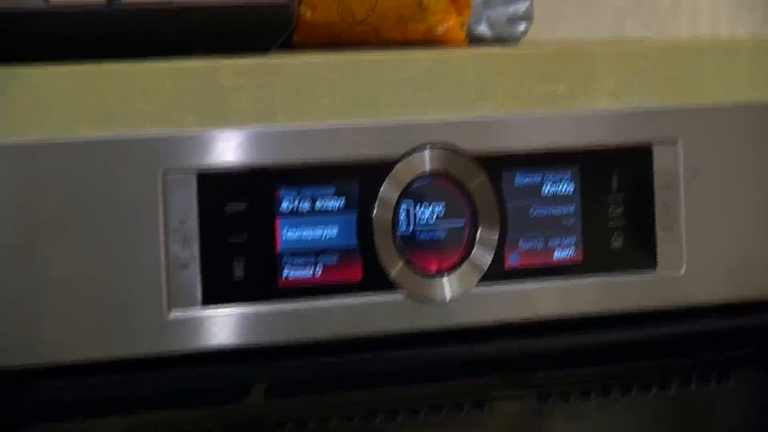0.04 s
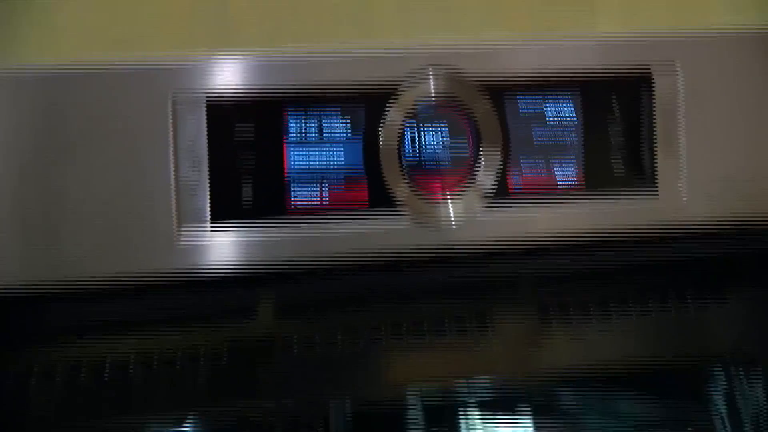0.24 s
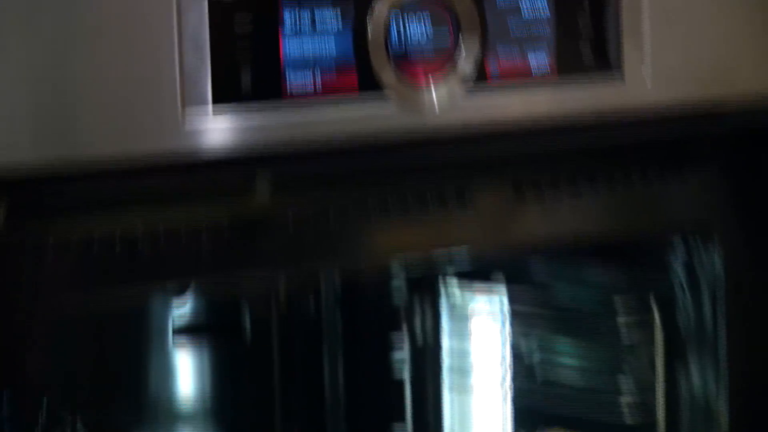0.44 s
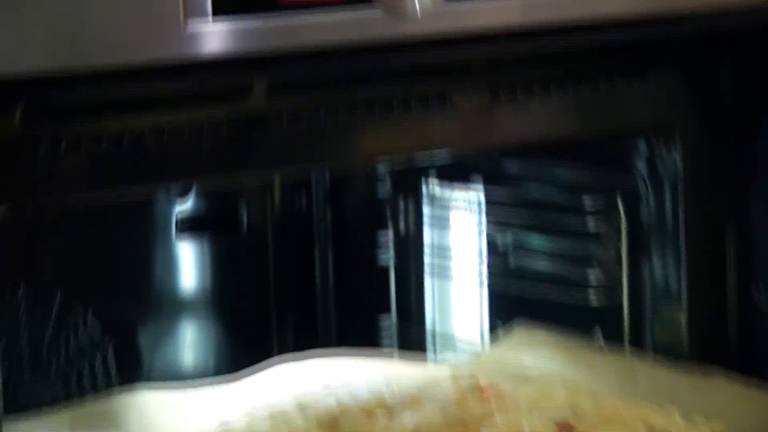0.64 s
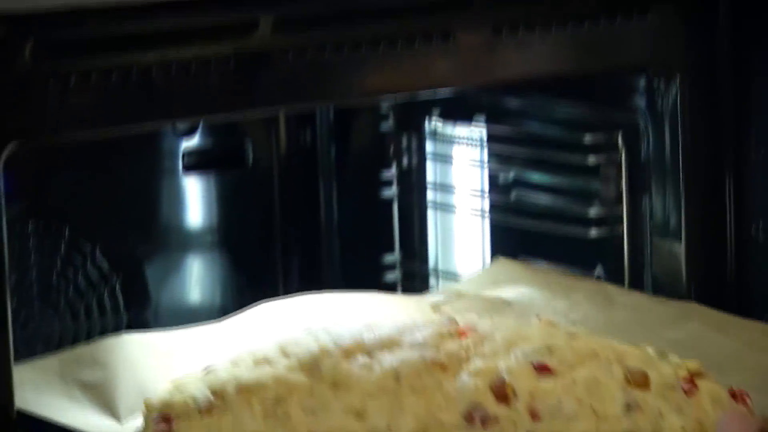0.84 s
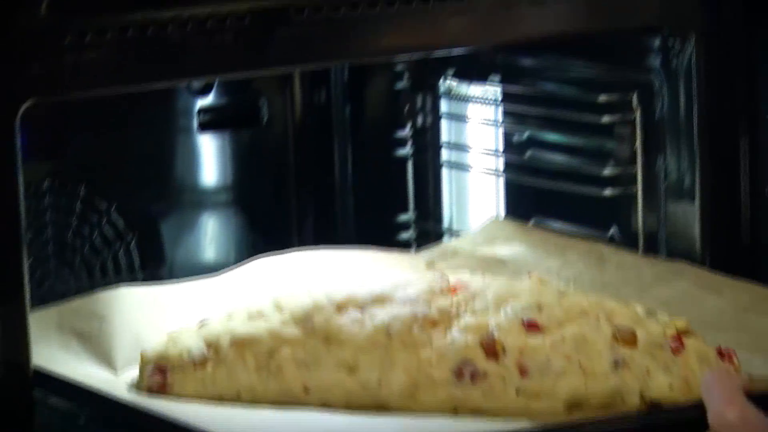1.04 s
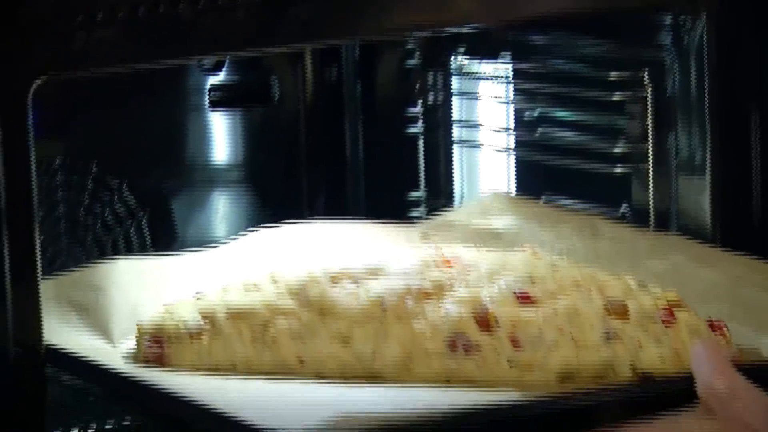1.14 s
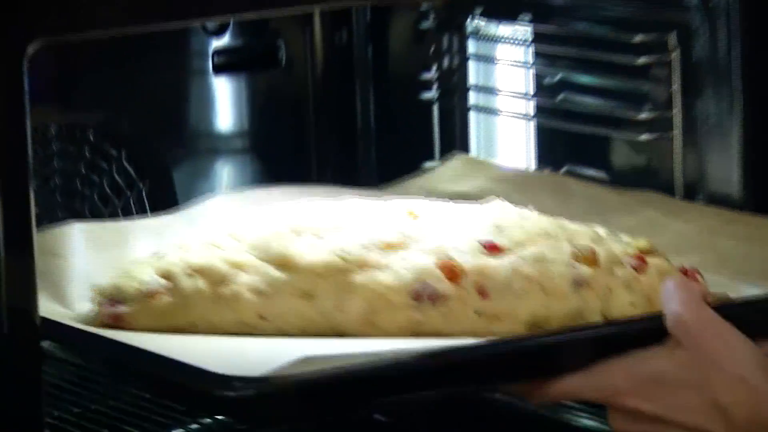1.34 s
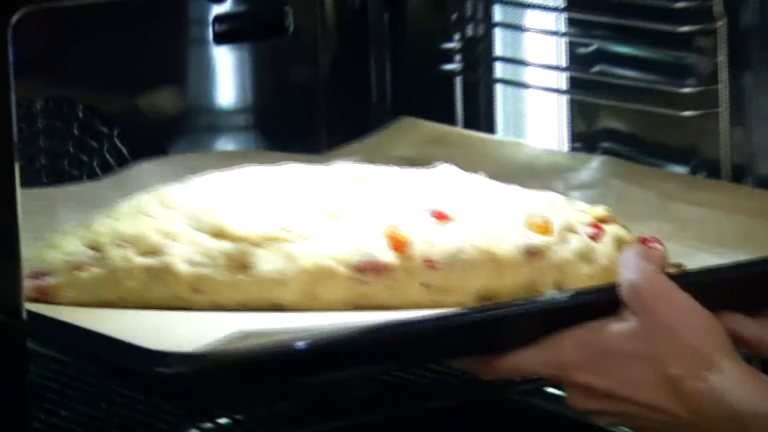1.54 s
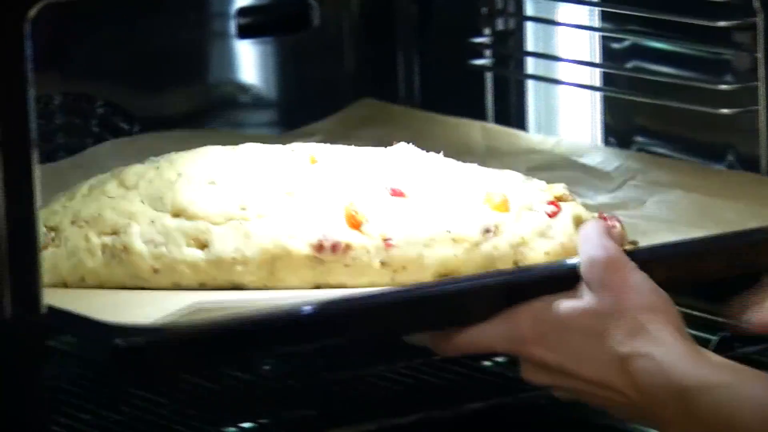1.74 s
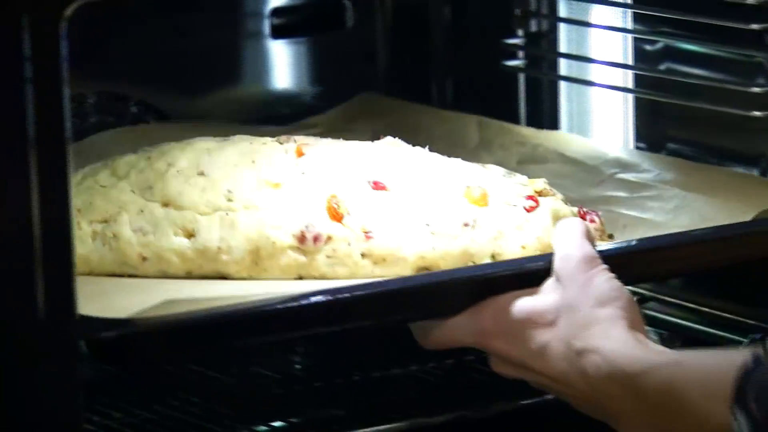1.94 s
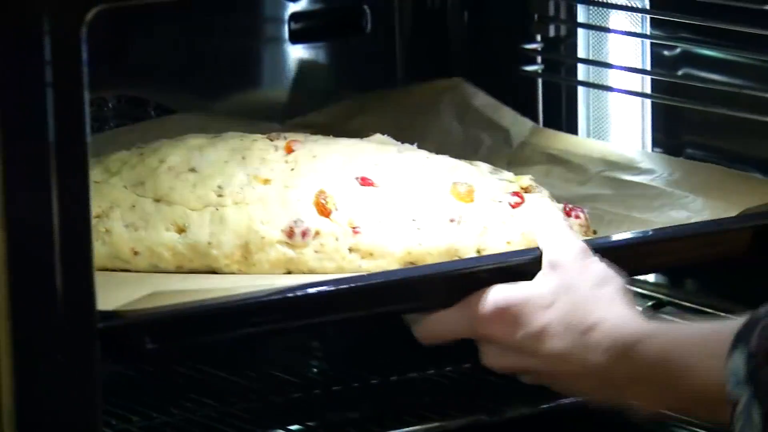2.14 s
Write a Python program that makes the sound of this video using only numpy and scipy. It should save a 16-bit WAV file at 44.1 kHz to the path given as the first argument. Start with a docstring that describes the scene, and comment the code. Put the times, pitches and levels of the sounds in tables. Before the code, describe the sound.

A metal baking tray clatters and scrapes along a wire oven rack.

```python
"""A kitchen, close to the oven, as a metal baking tray goes in.
After a soft swish the open door bumps twice against its stop and its panels ring. The tray clatters
onto the wire rack, scrapes along it in tiny stick-slip jolts, squeaks where its rim catches and rattles
home; a second swish follows. The oven fan hums throughout and the kitchen rings after each blow."""
import sys
import numpy as np
from scipy import signal
from scipy.fft import rfft, irfft, next_fast_len
from scipy.io import wavfile
from scipy.ndimage import map_coordinates

SR = 44100
rng = np.random.default_rng(int(sys.argv[2]) if len(sys.argv) > 2 else 0)


def unload_wav(signal):
    """Save mono or channel-first audio to the path in sys.argv[1] as 16-bit WAV at rate SR, clipped to [-1, 1]."""
    wavfile.write(
        sys.argv[1],
        SR,
        np.round(np.clip(np.atleast_2d(signal).T, -1, 1) * 32767).astype(np.int16),
    )


N = 96843
T = np.arange(N) / SR

# the kitchen's reverb tail: freq_hz, t60_s
KITCHEN_DECAY = [(80, 0.85), (210, 1), (560, 0.91), (1500, 0.61), (3900, 0.37), (10000, 0.3)]
# the short clatter of metal inside the oven: freq_hz, t60_s
CLATTER_DECAY = [(100, 0.48), (600, 0.18), (2500, 0.088), (10000, 0.05)]
# attack of a ring, slowest in the lows: freq_hz, rise_s
BLOOM = [(120, 0.015), (500, 0.0035), (1200, 0.00067), (4000, 0.00033)]


def tray_knocks():
    """The tray's rim strikes the rack wires; each hit clatters and sets the tray ringing."""
    # hits on the rack: start_s, level_db, thud_db, bright_db, snap_db
    hits = [(0.9040, -14, -9.5, -10, -2), (0.9102, -21.5, 0, -1, 4), (0.9300, -14.5, 2, 3.5, 6.5),
            (0.9775, -21.5, 4.5, 1, 9.5), (0.9914, -23.5, -8, -8.5, 8.5), (1.0367, -32, 1.5, -2, 13),
            (1.3106, -19.5, -13, 4, 1), (1.4097, -24.5, -11, -11, 4), (1.4865, -21, -9, 3, -2.5),
            (1.5737, -25, -10, 6, 3.5), (1.6616, -14.5, -4, 2, 5.5), (1.7720, -12.5, 9, 2.5, 2.5),
            (1.7795, -24, 9.5, -7, 18), (1.8172, -10.5, 10, 10, 7), (1.8543, -13.5, 6, 6.5, 11.5),
            (1.8590, -16.5, 8, 6, 7), (1.8910, -13.5, 3, 2.5, 3), (1.9220, -16.5, -4, 3.5, -2),
            (1.9562, -16, 3, 0.5, -10), (1.9678, -21, -17, -1.5, 2), (2.0595, -19.5, -3.5, -0.5, -2)]
    # EQ of a tray hit: freq_hz, gain_db
    colour = [(24, -49), (40, -42), (139, -1.5), (235, -16), (427, -9.5), (577, -7.5), (653, -0.5),
              (740, -10), (1640, -15), (2220, -7), (3300, -11.5), (7910, -17), (15500, -38)]
    out = np.zeros(N)
    for start_s, level_db, thud_db, bright_db, snap_db in hits:
        hit = blow(colour, CLATTER_DECAY, thud_db, bright_db, snap_db,
                   snap_s=0.0044, snap_hz=1050, room_db=-10.5)
        add(out, start_s, amp(level_db) * (hit + amp(-3.5) * tray_ring()))
    return out


def tray_ring():
    """The loaded tray rings in its modes, the highest dying first."""
    # the tray's resonances: pitch_hz, level_db
    resonances = [(133, -3), (156, 0.5), (189, -4.5), (270, -6), (381, -4), (440, -1), (558, -2), (658, 2),
                  (835, -4), (1180, -2.5), (1410, -2.5), (2217, -7), (2268, -0.5), (5399, -14), (7000, 0)]
    # their ring time: freq_hz, t60_s
    decay = [(120, 0.18), (270, 0.42), (600, 0.12), (2300, 0.21), (7000, 0.047)]
    hz, db = np.transpose(resonances)
    return struck_modes(hz, db, curve_at(decay, hz))


def tray_slide():
    """Fine slips hiss along the rim, coarser jolts shake the rack, and both ring the tray."""
    # friction envelope: time_s, level_db
    friction_levels = [(1.0, -35), (1.1, -41), (1.2, -40.5), (1.309, -32), (1.311, -30), (1.38, -27.5),
                       (1.44, -21.5), (1.47, -30), (1.56, -29), (1.645, -23), (1.70, -28), (1.76, -30.5),
                       (1.83, -25), (1.88, -23.5), (1.97, -28.5), (2.04, -35.5), (2.19, -41)]
    # EQ of the scrape: freq_hz, gain_db
    rasp_colour = [(200, -19), (410, -2), (700, -7), (1150, -0.5), (1600, -5), (2180, -1), (3720, -7.5),
                   (6770, -7), (10000, -15), (15800, -22)]
    # high-shelf ride on the scrape: time_s, gain_db
    treble_levels = [(1.0, -10), (1.2, -3), (1.305, -4), (1.315, 7.5), (1.38, 2.5), (1.43, -1.5),
                     (1.6, 1.5), (1.7, -1), (1.8, 1), (2.19, -19)]
    # envelope of the loaded tray shuddering on the wires: time_s, level_db
    shudder_levels = [(1.0, -33), (1.15, -49), (1.32, -38), (1.375, -25.5), (1.43, -39), (1.54, -35.5),
                      (1.64, -29), (1.70, -28), (1.77, -22.5), (1.85, -20), (1.97, -25), (2.05, -28.5),
                      (2.19, -52)]
    # EQ of the shudder: freq_hz, gain_db
    shudder_colour = [(25, -39), (50, -26), (80, -18), (110, -4.5), (135, 3), (165, -9.5), (210, -11.5),
                      (270, -5.5), (320, -13.5), (440, -7.5), (640, -4.5), (1200, -19.5), (2000, -26),
                      (4000, -76)]
    friction = slips(per_s=2500) * envelope(friction_levels) * amp(2.92 * wobble(70))
    rasp = equalise(friction, rasp_colour)
    treble = signal.sosfiltfilt(highpass(hz=7040), rasp)
    rasp = rasp + treble * (envelope(treble_levels) - 1)
    jolts = slips(per_s=600) * envelope(shudder_levels) * amp(2.2 * wobble(39.85))
    shudder = equalise(jolts, shudder_colour)
    ring = resonate(amp(-8.5) * friction + amp(-9.5) * jolts, tray_ring())
    cavity = resonate(rasp, noise_tail(CLATTER_DECAY))
    room = resonate(rasp + shudder, noise_tail(KITCHEN_DECAY))
    return amp(-2.5) * rasp + amp(-1.5) * cavity + amp(-3) * shudder + ring + amp(-10) * room


def slips(per_s, spread_db=2.5):
    """Stick-slip: a random train of tiny jolts of uneven size."""
    slipping = rng.random(N) < per_s / SR
    size = amp(spread_db * rng.standard_normal(N))
    direction = np.sign(rng.standard_normal(N))
    return unit_rms(slipping * direction * size)


def tray_groans():
    """The tray's bottom groans as stick-slip briefly locks onto one low mode."""
    # swells of the groan: peak_s, level_db, half_length_s
    groans = [(1.395, -25.5, 0.04), (1.60, -28.5, .035)]
    pitch_hz = 269
    swell = sum(amp(db) * np.exp(-((T - peak_s) / half_s) ** 2) for peak_s, db, half_s in groans)
    return swell * np.sin(2 * np.pi * pitch_hz * T + 0.18 * wobble(49.8))


def rim_squeaks():
    """The rim catches on a wire and gives a short squeak of wavering pitch."""
    # catches: start_s, pitch_hz, level_db, length_s
    squeaks = [(1.312, 478.7, -23.5, 0.029), (1.436, 601, -27, 0.043)]
    # a squeak's overtones: harmonic_number, level_db
    partials = [(2, 0), (3, -1), (4, 0), (5, -21)]
    out, t = np.zeros(N), T[:SR]
    for start_s, pitch_hz, level_db, length_s in squeaks:
        cycles = np.cumsum(pitch_hz * (1 + 0.017 * wobble(210)))[:SR] / SR
        tone = sum(amp(db) * np.sin(2 * np.pi * harmonic * cycles) for harmonic, db in partials)
        shape = attack(t, rise_s=0.00067) * np.exp(-(t / length_s) ** 2)
        add(out, start_s, amp(level_db) * tone * shape)
    return out


def wire_pings():
    """The rim plucks single rack wires, each ringing as a pure tone."""
    # plucks: start_s, pitch_hz, level_db, t60_s
    pings = [(1.407, 2095, -23, 0.13), (1.452, 1180, -26, .2), (2.061, 2275, -18, 0.11)]
    out, t = np.zeros(N), T[:SR]
    for start_s, pitch_hz, level_db, t60_s in pings:
        shape = attack(t, rise_s=0.0017) * amp(-60 * t / t60_s)
        add(out, start_s, amp(level_db) * np.sin(2 * np.pi * pitch_hz * t) * shape)
    return out


def scrape_whistle():
    """A thin, grainy whistle glides above the scrape."""
    # the whistle's path: time_s, pitch_hz, level_db
    glide = [(1.05, 7750, -72), (1.161, 7700, -49), (1.251, 8600, -47), (1.321, 8360, -36),
             (1.391, 8960, -35), (1.45, 9100, -60)]
    time_s, pitch_hz, level_db = np.transpose(glide)
    tone = np.sin(2 * np.pi * np.cumsum(np.interp(T, time_s, pitch_hz)) / SR)
    return tone * wobble(900) * amp(np.interp(T, time_s, level_db, left=-120, right=-120))


def door_bumps():
    """The heavy door meets its stop and rebounds once; its panels ring."""
    # bumps on the stop: start_s, level_db, thud_db, bright_db
    bumps = [(0.2923, -15, 1, -0.5), (0.5119, -22, -3.5, 5.5)]
    # EQ of a bump: freq_hz, gain_db
    colour = [(25, -42), (50, -30), (90, -14), (130, -1), (200, -10), (260, -8), (380, -8.5), (540, -7.5),
              (740, -14.5), (860, -10.5), (1150, -14), (1700, -9), (2100, -12.5), (2700, -15),
              (5000, -28.5), (9000, -34), (15000, -55)]
    # decay of the door's clatter: freq_hz, t60_s
    decay = [(100, 0.24), (600, 0.23), (2000, 0.11), (5000, 0.11), (10000, 0.039)]
    # panel resonances: pitch_hz, level_db, t60_s
    panel_modes = [(128.9, 6.5, 0.44), (373, -7, 0.33), (425, -6, 0.56), (538, -8.5, 0.52), (607, -14, 0.7),
                   (836, -2.5, 0.3), (1530, -11, 0.41), (1770, -11, 0.48), (2620, -22, 0.14)]
    out = np.zeros(N)
    for start_s, level_db, thud_db, bright_db in bumps:
        hit = blow(colour, decay, thud_db, bright_db, snap_db=2, snap_s=0.0028, snap_hz=1300, room_db=-8.5)
        ring = struck_modes(*np.transpose(panel_modes))
        add(out, start_s, amp(level_db + 3.5) * (hit + amp(-3) * ring))
    return out


def blow(colour, decay, thud_db, bright_db, snap_db, snap_s, snap_hz, room_db):
    """One impact: a sharp snap, the dense short clatter of sheet metal, the kitchen's tail."""
    t = T[:SR]
    burst = amp(snap_db) * rng.standard_normal(SR) * np.exp(-t / snap_s)
    snap = signal.sosfilt(highpass(snap_hz), burst)
    room = amp(room_db) * noise_tail(KITCHEN_DECAY) * attack(t, rise_s=0.0063)
    contact = (snap + noise_tail(decay) + room) * attack(t, rise_s=0.0001)
    # this hit's weight and brightness around a steady midrange: freq_hz, gain_db
    tilt = [(593, thud_db), (1840, 0), (6400, bright_db), (15000, 1.07 * bright_db)]
    return equalise(contact, colour, tilt)


def struck_modes(hz, db, t60_s):
    """Damped modes whose balance shifts with every strike, as if hit at a new spot."""
    t = T[:SR]
    gains = amp(db + 2 * rng.standard_normal(len(hz)))
    phase = rng.uniform(0, 2 * np.pi, (len(hz), 1))
    shape = attack(t, curve_at(BLOOM, hz)[:, None]) * amp(-60 * t / t60_s[:, None])
    tones = np.sin(2 * np.pi * hz[:, None] * t + phase)
    return gains @ (tones * shape) / np.linalg.norm(gains)


def swishes():
    """Two light brushes of noise swell and fade into the kitchen's reverb."""
    # swells, rise and fall timed over 20 dB: start_s, peak_s, level_db, rise_s, fall_s
    swells = [(0.034, 0.1, -35.5, 0.12, 0.19), (2.129, 2.143, -22, 0.038, 0.061)]
    # one EQ curve per swish: freq_hz, gain_db
    colours = [
        [(290, -35), (500, -12), (805, -3.5), (1110, -13), (1500, -16), (1590, -26), (1710, -16.5), (3000, -10),
         (3320, -15), (9950, -18), (15800, -24)],
        [(530, -54), (900, -5), (1390, -10), (2880, -4.5), (4380, -6), (4820, -3.5), (5570, -4), (15800, -20.5)],
    ]
    out = np.zeros(N)
    for (start_s, peak_s, level_db, rise_s, fall_s), colour in zip(swells, colours):
        below_peak_db = 20 * np.maximum((peak_s - T) / rise_s, (T - peak_s) / fall_s)
        fade_in = np.clip((T - start_s) / 0.0079, 0, 1)
        out += amp(level_db + 2.5 - below_peak_db) * fade_in * noise(colour)
    return out + amp(-7.5) * resonate(out, noise_tail(KITCHEN_DECAY))


def oven_fan():
    """A bed of moving air with a slightly unsteady motor hum."""
    # EQ of the air: freq_hz, gain_db
    air_colour = [(25, -46), (50, -9), (80, -2), (130, 0.5), (200, 2.5), (400, -4.5), (560, -2), (830, -4),
                  (1060, -10), (1400, -9.5), (2500, -17.5), (4200, -18), (4570, -20), (4950, -26.5),
                  (7400, -28.5), (15800, -33.5)]
    air_db, hum_db, hum_hz = -43, -47, 96.7
    phase = 2 * np.pi * hum_hz * T + 0.75 * wobble(8.4)
    hum = np.sqrt(2) * np.sin(phase) * amp(2.1 * wobble(8.1))
    return amp(air_db) * noise(air_colour) + amp(hum_db) * hum


def noise_tail(decay):
    """One second of noise in which each frequency builds and dies at its own speed."""
    hz, t, spectrum = signal.stft(rng.standard_normal(SR), SR, nperseg=256)
    bloom = attack(t + 64 / SR, curve_at(BLOOM, hz)[:, None])
    fade = amp(-60 * t / curve_at(decay, hz)[:, None])
    return signal.istft(spectrum * bloom * fade, SR, nperseg=256)[1][:SR]


def resonate(x, response):
    """Play a sound through an impulse response scaled to unit energy."""
    return signal.fftconvolve(x, response / np.linalg.norm(response))[:N]


def equalise(x, *curves):
    """Minimum-phase EQ of unit power gain, the sum of (freq_hz, gain_db) curves."""
    size = 2 * next_fast_len(N)
    hz = np.fft.rfftfreq(size, 1 / SR)
    gain = unit_rms(amp(sum(curve_at(curve, hz) for curve in curves)))
    cepstrum = irfft(np.log(np.maximum(gain, 1e-6)), size)
    # fold onto positive time so that nothing rings ahead of a hit
    cepstrum[1:size // 2] *= 2
    cepstrum[size // 2 + 1:] = 0
    return irfft(rfft(x, size) * np.exp(rfft(cepstrum)), size)[:len(x)]


def highpass(hz):
    """A second-order low cut."""
    return signal.butter(2, hz, "high", fs=SR, output="sos")


def noise(colour):
    """Coloured noise of rms 1."""
    return unit_rms(equalise(rng.standard_normal(N), colour))


def wobble(knots_per_s):
    """A smooth random modulation curve."""
    return map_coordinates(rng.standard_normal(2000), [T * knots_per_s], mode="wrap")


def attack(t, rise_s):
    """An exponential rise from 0 towards 1."""
    return 1 - np.exp(-t / rise_s)


def envelope(points):
    """Gain per sample from (time_s, level_db) points, silent before the first."""
    return amp(np.interp(T, *np.transpose(points), left=-120))


def curve_at(points, hz):
    """Read (freq_hz, value) points along a log frequency axis."""
    freqs, values = np.transpose(points)
    return np.interp(np.log(hz + 1), np.log(freqs + 1), values)


def amp(db):
    """Decibels to gain."""
    return 10 ** (np.asarray(db) / 20)


def unit_rms(x):
    """Scale to rms 1."""
    return x / np.sqrt(np.mean(x ** 2) + 1e-20)


def add(track, start_s, sound):
    """Mix a sound in at its cue."""
    i = int(round(start_s * SR))
    track[i:i + len(sound)] += sound[:N - i]


def scene():
    """Door, tray, swishes and fan in one mono mix."""
    impacts = door_bumps() + tray_knocks()
    scrape = tray_slide() + tray_groans() + rim_squeaks() + wire_pings() + scrape_whistle()
    return (impacts + scrape + swishes() + oven_fan())[None]


def record(dry):
    """Soft-clip the loudest peaks at full scale, then cut the very top of the treble."""
    top_hz = 16000
    rounded = dry / (1 + np.abs(dry) ** 6) ** (1 / 6)
    size = next_fast_len(N + 4096)
    passband = np.fft.rfftfreq(size, 1 / SR) < top_hz
    return irfft(rfft(rounded, size) * passband, size)[:, :N]


dry = scene()
out = record(dry)
unload_wav(out)
```